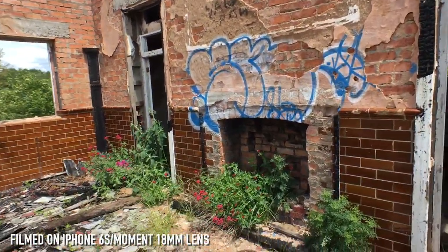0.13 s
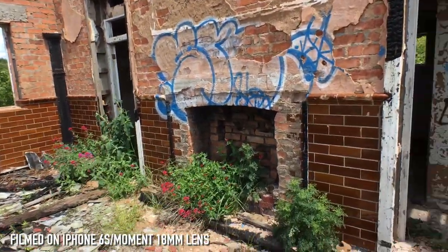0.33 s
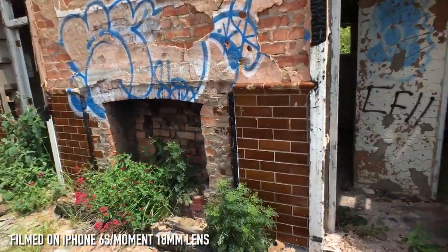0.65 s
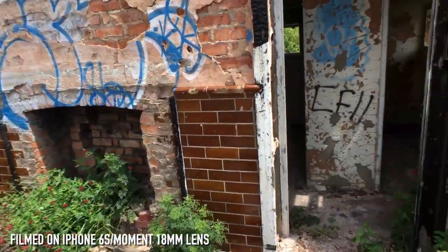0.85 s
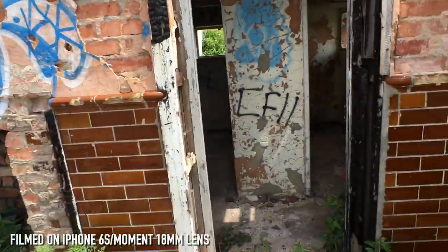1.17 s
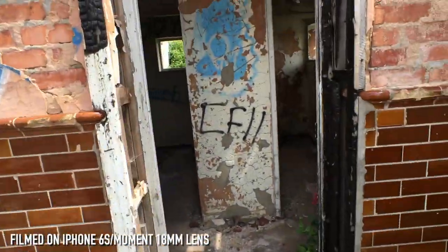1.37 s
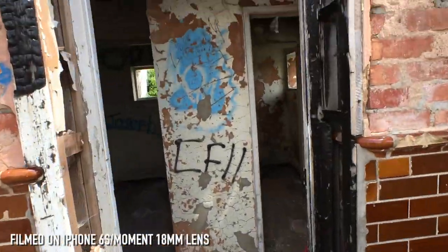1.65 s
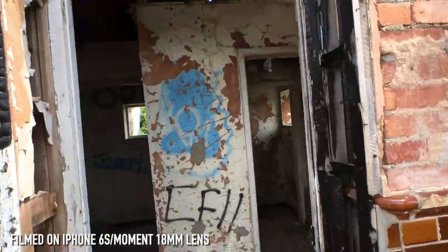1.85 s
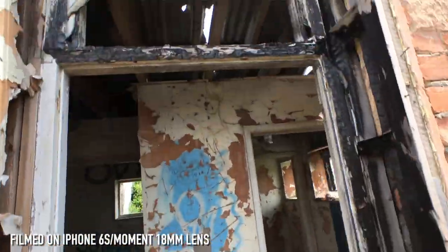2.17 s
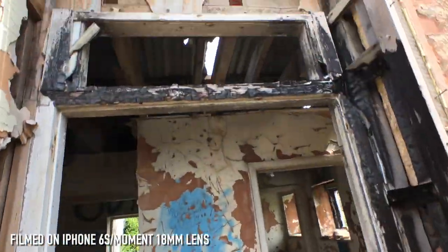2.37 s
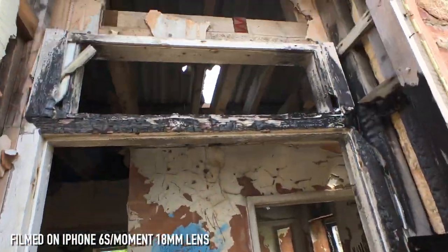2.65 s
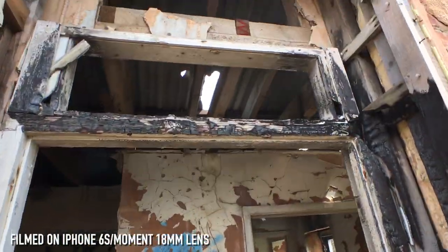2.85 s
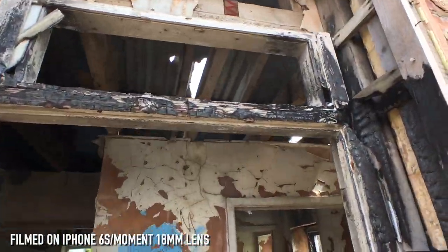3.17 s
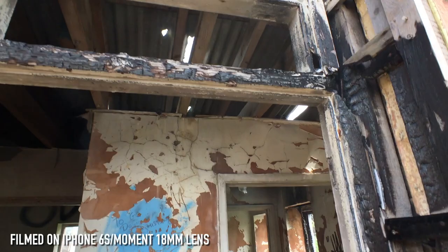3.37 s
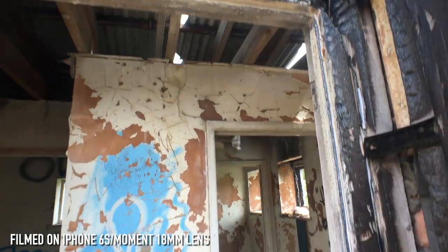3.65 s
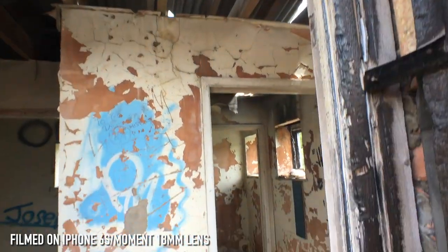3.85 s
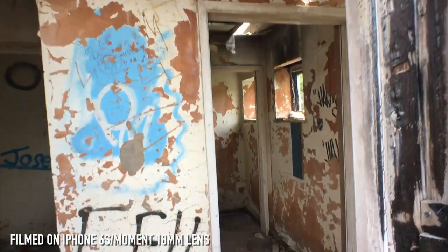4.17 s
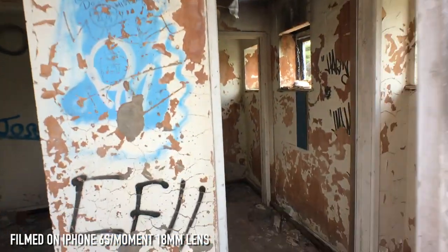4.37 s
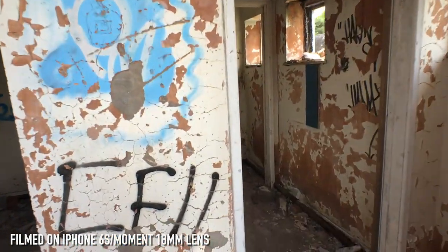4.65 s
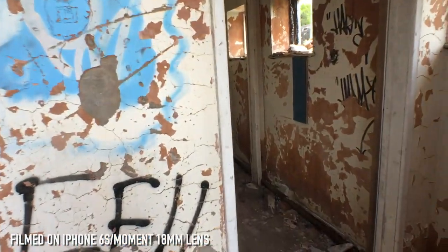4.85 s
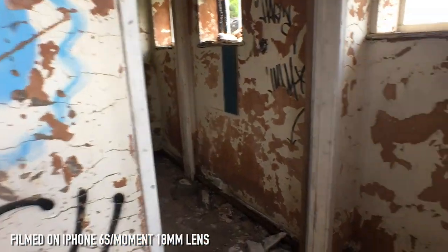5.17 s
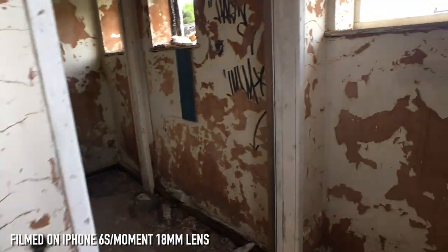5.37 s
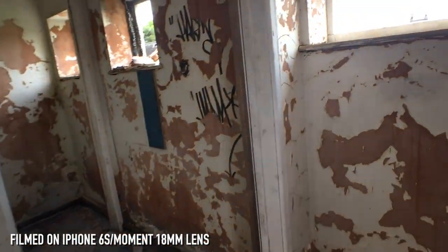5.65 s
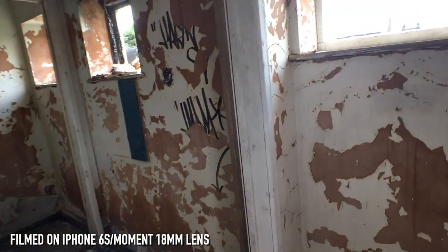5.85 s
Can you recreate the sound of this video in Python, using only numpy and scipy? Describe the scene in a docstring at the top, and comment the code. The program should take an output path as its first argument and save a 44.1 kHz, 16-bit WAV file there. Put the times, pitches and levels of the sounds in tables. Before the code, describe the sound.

Slow, uneven footsteps over broken glass and rubble, heard close in a bare derelict room with a short hard reverberation, over a very quiet outdoor hush. A small crack opens, then at 0.35-0.65 s a dense burst of brittle snaps and gritty crunching, thinning into ticks. At 1.3-1.5 s a heavier step knocks and cracks pieces together with a brief glassy ring. Another crunchy cluster comes at 1.9-2.4 s. Faint, falling bird whistles come from far outside between 1.7 and 3.3 s. Glass fragments clink delicately near 3.1 s; around 3.7 s a stone rasps briefly and shards clink again. Sharp cracks at 3.8 s and a firm knocking step at 4.0 s follow, then lighter crunches at 4.4-4.8 s. From 5.1 s clothing brushes in soft, dry rustles, with one small crack near 5.3 s and low air puffs on the microphone toward 5.9 s.

```python
"""Slow, uneven steps over broken glass and rubble, through a doorway into a derelict brick room.
Pieces snap and knock on the floor in noisy runs of slips, and shards clink in short decaying modes.
Grit grinds under the sole as dense random ticks, a stone rasps once, and the bare walls ring briefly.
A bird's gliding whistles come from far off; near the end clothing brushes past in bursts of fine ticks.
Air flutters low on the microphone, in puffs of shaped noise over a quiet outdoor hush."""
import sys
import numpy as np
from scipy import signal
from scipy.fft import rfft, irfft
from scipy.io import wavfile
from scipy.ndimage import uniform_filter1d

SR = 44100
rng = np.random.default_rng(int(sys.argv[2]) if len(sys.argv) > 2 else 0)


def transcribe(u):
    """Save the signal u as a 16-bit wav file named by the first command-line argument.

    u: samples, shape (n,) or (channels, n), limited to [-1, 1]; the rate is SR.
    q: integer samples, one column per channel.
    """
    v = np.clip(np.atleast_2d(u).T, -1, 1)
    q = np.round(v * 32767).astype(np.int16)
    wavfile.write(sys.argv[1], SR, q)


N = 265482
TIME = np.arange(N) / SR

# The sole settles softly, and each patch of floor has its own voice. Each row: start in seconds,
# floor resonance in Hz, level in dB, contact time in seconds, knock of pieces pressed on it in Hz,
# their thud in dB relative to the piece.
FOOTFALLS = [(.602, 330, -43, 0.0046, 1020, -4), (1.32, 345, -42, .0053, 920, -8.5),
             (1.387, 350, -46, 0.0041, 1010, -15), (2.11, 500, -50, 0.0052, 930, -9),
             (2.392, 594, -50, 0.0056, 1160, -19), (3.148, 626, -54, 0.0097, 900, -12),
             (4.0332, 236, -36, 0.0051, 850, -12), (4.487, 238, -48.5, 0.0057, 1130, -13),
             (4.632, 237.6, -45.5, 0.0047, 900, -16.5), (5.44, 181, -49, 0.018, 950, -7)]


def gain_of(db):
    """Decibels to an amplitude factor."""
    return 10 ** (np.asarray(db) / 20)


def evened(x):
    """Scales to rms 1."""
    return x / np.sqrt(np.mean(x ** 2) + 1e-20)


def blow(x):
    """Scales a short sound to the energy of a hundredth of a second at rms 1."""
    return x * np.sqrt(0.01 * SR / (np.sum(x ** 2) + 1e-20))


def read(points, hz):
    """Reads a curve of (Hz, value) points on a log-frequency axis."""
    f, value = np.transpose(points)
    return np.interp(np.log(hz + 1), np.log(f + 1), value)


def level(rows):
    """Gain over time from a curve of (seconds, dB) points."""
    s, db = np.transpose(rows)
    return gain_of(np.interp(TIME, s, db))


def coloured(x, points):
    """Filters x with a curve of (Hz, dB) points, then scales it to rms 1."""
    gains = gain_of(read(points, np.fft.rfftfreq(len(x), 1 / SR)))
    return evened(irfft(rfft(x) * gains, len(x)))


def band(x, lo_hz, hi_hz, order=2):
    """Causal band-pass."""
    sos = signal.butter(order, [lo_hz, min(hi_hz, SR / 2 - 100)], "band", fs=SR, output="sos")
    return signal.sosfilt(sos, x)


def resonate(x, hz, width_hz):
    """One resonance with a peak gain of 1."""
    return signal.lfilter(*signal.iirpeak(hz, hz / width_hz, SR), x)


def add(mix, s, sound):
    """Mixes a sound in at time s, cut where the mix ends."""
    part = mix[max(round(s * SR), 0):][:len(sound)]
    part += sound[:len(part)]


def swell(s, rise, fade):
    """An envelope that grows to 1 at time s and dies away."""
    return np.exp(-np.maximum((s - TIME) / rise, (TIME - s) / fade))


def fracture(t, seconds, spread_db=3.0, rise=0.18):
    """A run of tiny slips of uneven size that builds up and dies away."""
    seconds = max(seconds, .0003)
    sizes = gain_of(spread_db * rng.standard_normal(len(t)))
    envelope = (1 - np.exp(-t / (rise * seconds))) * np.exp(-t / seconds)
    return rng.standard_normal(len(t)) * sizes * envelope


def grains(per_s, spread_db, cycles, count=28):
    """Random ticks ring through paired resonances; small, high ones are the most frequent."""
    pitches = np.geomspace(250, 15000, count)
    shares = np.sqrt(pitches) / np.sqrt(pitches).sum()
    at = rng.integers(0, N, int(per_s * N / SR))
    sizes = gain_of(spread_db * np.minimum(rng.exponential(1, len(at)), 4))
    sizes = sizes * rng.choice([-1, 1], len(at))
    kind = rng.choice(count, len(at), p=shares)
    out = np.zeros(N)
    for k, hz in enumerate(pitches):
        ticks = np.bincount(at[kind == k], sizes[kind == k], N) / np.sqrt(shares[k])
        width = hz / max(cycles, 1)
        out += resonate(resonate(ticks, hz, width), hz, width)
    return out


def cracks(ring=0.97, body=0.43):
    """Each break snaps and fizzes at once; a moment later the piece knocks and the floor thuds."""
    # Breaking or shifting pieces. Each row: start in seconds, grinding time in seconds, crack in dB,
    # crack pitch in Hz, knock in dB, splinter fizz in dB.
    breaks = [(.004, 0.0014, -43, 3520, -50.5, -71), (0.112, 0.0025, -52.5, 2340, -49.5, -83),
              (0.3513, 0.0019, -31, 5060, -33.5, -44), (.369, 0.0024, -37, 4880, -60, -54),
              (0.4088, 0.00058, -36.5, 3274, -43, -50.5), (.447, 0.00099, -41.5, 4800, -44, -55),
              (.465, 0.0018, -42.5, 5430, -52, -56), (0.4919, 0.0014, -45, 5500, -69, -56),
              (0.5065, 0.0013, -39.5, 3900, -36.5, -52), (.5195, .002, -40, 4400, -60, -58),
              (0.526, 0.0044, -36, 3230, -49, -64), (0.5444, 0.0049, -33, 4400, -38.5, -31.5),
              (.557, 0.0019, -42, 3980, -38, -55), (0.601, 0.0011, -42.5, 3900, -43, -63),
              (.6471, 0.0027, -42.5, 3800, -44, -53.5), (.7328, 0.0011, -49, 4040, -54, -58),
              (0.7982, 0.002, -47, 3860, -48.5, -53.5), (0.9101, 0.0017, -54, 2950, -56.5, -63),
              (0.933, .0021, -56, 2350, -63, -57.5), (1.018, 0.0029, -56.5, 3630, -59, -64),
              (1.0424, 0.002, -55.5, 3200, -58.5, -65), (1.293, 0.0024, -37, 2860, -38, -50),
              (1.295, 0.004, -33, 2840, -27, -50), (1.3159, 0.012, -42.5, 3170, -41, -46),
              (1.357, 0.017, -41, 4280, -36.5, -51), (1.3836, 0.0087, -34.5, 2900, -39, -47),
              (1.4031, 0.0058, -29, 3000, -31, -46), (1.412, 0.0021, -29.5, 3280, -24, -45),
              (1.4187, .0067, -30.5, 2670, -39, -48), (1.45, 0.012, -32, 3400, -34.5, -53),
              (1.46, 0.01, -43, 3880, -35.5, -63), (1.4712, 0.0036, -34.5, 2750, -41, -58),
              (1.5912, 0.0058, -56, 4660, -49, -93), (1.6772, 0.0014, -47, 4360, -53.5, -51),
              (1.923, .0009, -55, 3660, -71, -56), (1.9363, 0.0016, -40, 3900, -52.5, -42),
              (1.942, 0.0029, -41.5, 4600, -55, -43), (2.017, 0.0013, -57, 3840, -79, -51.5),
              (2.0768, 0.009, -42.5, 3180, -48, -50.5), (2.092, 0.0077, -35, 3680, -40.5, -49),
              (2.109, 0.0042, -36, 3620, -58, -42.5), (2.122, 0.0024, -32.5, 3070, -40.5, -40.5),
              (2.13, 0.0034, -34, 3600, -55, -43), (2.183, 0.0057, -44, 4100, -54, -49.5),
              (2.211, 0.0087, -39.5, 3900, -58, -54), (2.3338, 0.0066, -43.5, 3770, -66, -54.5),
              (2.3907, 0.0025, -36.5, 4300, -46.5, -48), (2.397, 0.018, -38.5, 4100, -53, -49),
              (3.0595, 0.04, -48, 3970, -60, -49.5), (3.1419, 0.01, -48, 4730, -45.5, -51),
              (3.299, 0.0056, -52, 4640, -65, -58), (3.3608, 0.02, -48, 4400, -59, -59.5),
              (3.438, 0.0052, -47, 4210, -58.5, -62), (3.4843, 0.0059, -55, 5840, -78, -55),
              (3.516, 0.0044, -55, 4220, -55.5, -63), (3.556, 0.016, -48, 4100, -55.5, -62),
              (3.623, .012, -39, 4830, -43.5, -52), (3.732, .0053, -47, 5030, -71, -72),
              (3.825, 0.0076, -29, 3510, -44.5, -41), (3.8303, 0.0019, -32.5, 4120, -42, -42),
              (3.9088, 0.0038, -37, 4510, -52, -55), (4.0333, 0.002, -27.5, 4390, -29.5, -38),
              (4.039, 0.0016, -35, 3810, -23.5, -41), (4.2715, 0.0019, -53.5, 3600, -73, -77),
              (4.309, 0.0075, -49, 3950, -58, -61), (4.3804, 0.0047, -43, 3600, -51, -51.5),
              (4.4298, 0.0062, -61, 3900, -45.5, -70), (4.4863, 0.0021, -38.5, 4380, -50, -42),
              (4.56, 0.0065, -45.5, 4840, -62, -50), (4.633, 0.0024, -42, 5300, -46, -48.5),
              (4.637, 0.00097, -39, 4900, -37.5, -51), (4.738, 0.014, -53, 3870, -52.5, -65),
              (4.7803, 0.0044, -51, 3600, -58.5, -63), (5.0135, .0038, -56, 4000, -69, -72),
              (5.2875, 0.0031, -44.5, 4400, -55.5, -52)]
    # Hollow resonances of the littered floor. Each row: pitch in Hz, width in Hz, level in dB.
    floor_modes = [(190.7, 110, -5.5), (305, 43, -11.5), (354, 56, -3), (555, 60, -0.5), (708, 20, -2)]
    out = np.zeros(N)
    t = np.arange(4096) / SR
    for s, seconds, crack_db, crack_hz, knock_db, fizz_db in breaks + chips():
        knock_hz, shake_db = pressed(s)
        thud_db = max(crack_db, knock_db) + shake_db
        slips = fracture(t, seconds)

        snap = resonate(slips, crack_hz, 1900) + 0.15 * slips
        snap += ring * shard(slips, crack_hz, width_hz=70, scatter=.5)
        splinters = resonate(slips, 9230, 2200) + 0.18 * slips
        splinters += ring * shard(slips, 10500, width_hz=520, scatter=0.19)
        tap = resonate(slips, knock_hz, 350) + body * resonate(slips, .8 * knock_hz, 320) + 0.12 * slips
        thud = sum(gain_of(db) * resonate(slips, hz, width) for hz, width, db in floor_modes)

        add(out, s, gain_of(crack_db) * blow(band(snap, 1770, 6500, order=4)))
        add(out, s, gain_of(fizz_db) * blow(band(splinters, 7240, 13600, order=3)))
        add(out, s + 0.00035, gain_of(knock_db) * blow(band(tap, 482, 1500)))
        add(out, s + 0.00056, gain_of(thud_db) * blow(band(thud, 160, 1200)))
    return out


def chips(count=120, crowding=.65, growth=0.55, spread_db=5, fizz_growth=0.6, shortening=0.26):
    """Tiny chips give way at random, more and louder in hard grinding; small ones tick shorter, brighter."""
    # centre values under the hardest grinding
    chip_db, chip_hz, chip_s = -49.5, 3900, 0.0032
    chip_knock_db, chip_fizz_db = -57, -58.5
    force = grinding()
    share = np.cumsum(force ** crowding)
    when, chance, pitch = rng.random((count, 3)).T
    s = np.interp((np.arange(count) + when) / count, share / share[-1], TIME)
    force_db = 20 * np.log10(np.interp(s, TIME, force) / force.max())
    size_db = growth * force_db + spread_db * (2 * chance - 1)
    seconds = chip_s * gain_of(shortening * size_db)
    crack_hz = chip_hz * 2 ** (.5 * (pitch - .5))
    # same columns as the breaking pieces
    return list(zip(s, seconds, chip_db + size_db, crack_hz,
                    chip_knock_db + size_db, chip_fizz_db + fizz_growth * size_db))


def pressed(s):
    """Weight near a footfall presses pieces down: they take the floor's pitch and shake it more."""
    loose_hz, loose_thud_db = 1206, -21  # a piece lying free; its thud is relative to its own level
    load_s = 0.053  # how closely the weight keeps to the footfall
    landing, *_, knock_hz, thud_db = min(FOOTFALLS, key=lambda step: abs(step[0] - s))
    load = np.exp(-((s - landing) / load_s) ** 2)
    return loose_hz + load * (knock_hz - loose_hz), loose_thud_db + load * (thud_db - loose_thud_db)


def shard(slips, hz, width_hz, scatter, count=5):
    """Every piece has a few short modes of its own, scattered around hz."""
    modes = hz * np.exp(scatter * rng.uniform(-0.968, 1, count))
    return sum(resonate(slips, min(f, SR / 2 - width_hz), width_hz) for f in modes)


def footfalls(width_hz=110):
    """Rubber pushes on the floor and stirs one low, well damped resonance."""
    out = np.zeros(N)
    t = np.arange(SR // 5) / SR
    for s, hz, db, seconds, *_ in FOOTFALLS:
        push = resonate(fracture(t, seconds), hz, width_hz)
        add(out, s, gain_of(db) * blow(band(push, hz / np.sqrt(2), hz * 2, order=3)))
    return out


def glass(wander=0.022):
    """A pane fragment's modes shift a little at each touch; splinters ring in a close cluster."""
    # A loose pane fragment is nudged. Each row: start in seconds, level in dB,
    # contact time in seconds (0.3 ms at least is used), brightness in dB per octave.
    clinks = [(3.049, -51.5, 0.0026, 2), (3.06, -41, 0.0018, 6.5), (3.079, -49, 0.01, 3),
              (3.104, -44, 0.022, 4.5), (3.139, -41.5, 0.0024, 3), (3.158, -43.5, 0.0034, 8),
              (3.732, -39, 0.00027, -15), (3.7368, -42, 0.00094, -2), (3.75, -42.5, 0.00066, -14),
              (3.767, -46, 0.0035, 3)]
    # Modes of the fragment. Each row: nominal pitch in Hz, relative level in dB, 60 dB decay in seconds.
    pane_modes = [(2490, -11, 0.055), (3050, 3, 0.038), (3490, -3, 0.092), (3600, -16, .04), (3900, 1, .08),
                  (4400, -2, 0.077), (4740, -42, .05), (5435, 1.5, 0.037), (5850, -9, 0.054),
                  (7200, -17, .04), (8760, -12, .03), (9100, -7.5, .04), (9930, -6, 0.033),
                  (11700, -14.5, .04)]
    # Small splinters that ring around one note. Each row: start in seconds, pitch in Hz, level in dB,
    # 60 dB decay in seconds.
    pings = [(.696, 4540, -46, 0.046), (1.17, 3185, -51.5, 0.073), (1.3025, 5500, -41, 0.042),
             (1.362, 9660, -45.5, .053), (1.4091, 2520, -25.5, 0.022), (1.412, 5430, -31.5, .037),
             (1.9369, 9100, -31, 0.0044), (1.9369, 12700, -39, .0046), (2.123, 2450, -36, 0.015),
             (2.392, 3600, -44, 0.2), (2.396, 5400, -45, 0.12), (3.158, 4300, -41, 0.046),
             (3.4845, 5830, -47, 0.029), (3.7324, 5620, -35, .057), (3.766, 9500, -52, .06),
             (4.3805, 3550, -40, 0.02), (4.482, 5930, -44, 0.025), (4.634, 5850, -38, 0.033),
             (4.637, 3650, -43.5, 0.046)]
    out = np.zeros(N)
    t = np.arange(SR // 4) / SR
    for s, db, seconds, bright_db in clinks:
        contact = fracture(t, seconds)
        clink = np.zeros(len(t))
        for hz, mode_db, t60 in pane_modes:
            touched_hz = hz * (1 + wander * rng.uniform(-1.0, 1))
            mode = np.sin(2 * np.pi * touched_hz * t) * gain_of(-60 * t / t60)
            ring = signal.fftconvolve(contact, mode)[:len(t)]
            ring = resonate(ring, hz, hz / 10)  # thin glass gives off little between its modes
            clink += gain_of(mode_db + bright_db * np.log2(hz / 5000)) * blow(ring)
        add(out, s, gain_of(db) * blow(clink))
    partials = [(.945, -6.5), (.982, 1), (1, -1.5), (1.035, -4)]  # pitch ratio, dB
    for s, hz, db, t60 in pings:
        cluster = sum(gain_of(partial_db) * np.sin(2 * np.pi * (hz * ratio * t + rng.random()))
                      for ratio, partial_db in partials)
        add(out, s, gain_of(db) * blow(resonate(cluster * gain_of(-60 * t / t60), hz, hz * 0.23)))
    return out


def grit(dust_db=-4, crumbs_db=-7):
    """Fine dust crackles while weight rests on the sole, and a few glass crumbs tick in it."""
    # Spectrum of the dust. Each row: frequency in Hz, relative level in dB.
    dust_colour = [(150, -30.5), (500, 2.5), (1100, 1), (1800, -2.5), (4000, -4.5), (5800, 3), (7300, -10),
                   (9500, -8), (13000, -10), (16000, -13)]
    dust = coloured(grains(per_s=8400, spread_db=6.5, cycles=1.8), dust_colour)
    crumbs = evened(band(grains(per_s=570, spread_db=8, cycles=10), 720, 5000))
    return grinding() * (gain_of(dust_db) * dust + gain_of(crumbs_db) * crumbs)


def grinding():
    """How hard the sole works the grit, as a gain over time: overlapping swells add in power."""
    # The sole presses or turns on the grit. Each row: peak in seconds, force in dB,
    # rise in seconds, fade in seconds.
    presses = [(.02, -55.5, 0.054, .09), (.37, -53, .008, .08), (.525, -38, .015, .065),
               (.97, -62, .12, .1), (1.4, -57, .04, .04), (1.681, -58.5, .06, .12),
               (2.13, -46.5, .025, .085), (2.44, -59, .06, .025), (2.835, -68, .008, .015),
               (3.7, -54, .25, .08), (4.46, -57, .1, .03), (4.68, -57, .09, .14)]
    return np.sqrt(sum((gain_of(db) * swell(s, rise, fade)) ** 2 for s, db, rise, fade in presses))


def scrape(width_hz=700):
    """A stone dragged by the sole sticks and slips through a resonance that sinks."""
    # The path of the drag. Each row: time in seconds, resonance in Hz, level in dB.
    drag = [(3.636, 2500, -66), (3.665, 1880, -54), (3.689, 1130, -50), (3.712, 1000, -83)]
    s, hz, scrape_db = np.transpose(drag)
    t = np.arange(s[0], s[-1], 1 / SR)
    slips = rng.standard_normal(len(t)) * (rng.random(len(t)) < 1500 / SR)
    # shift the gliding pitch down to zero, smooth there, and shift back up
    turn = np.exp(2j * np.pi * np.cumsum(np.interp(t, s, hz)) / SR)
    r = np.exp(-np.pi * width_hz / SR)
    rasp = (turn * signal.lfilter([1 - r], [1, -r], slips / turn)).real
    rasp = evened(band(rasp, 480, 5000))
    out = np.zeros(N)
    add(out, s[0], gain_of(np.interp(t, s, scrape_db)) * rasp * signal.windows.tukey(len(t), .3))
    return out


def cloth(rub_db=-4.0, swish_db=-1, catch_db=1.5):
    """Fibres catch and let go densely: a dull rub and a bright swish."""
    # A sleeve brushes past. Each row: peak in seconds, rise in seconds, fade in seconds,
    # rub in relative dB, swish in relative dB.
    brushes = [(5.116, 0.0078, 0.12, -47.5, -58.5), (5.17, .012, 0.14, -55.5, -52),
               (5.285, 0.056, 0.028, -46.5, -53.5), (5.405, 0.017, 0.021, -56.5, -53.5),
               (5.47, 0.08, 0.11, -51.5, -61), (5.778, 0.015, .06, -79, -56.5),
               (5.85, 0.052, 0.14, -47, -52.5)]
    # Spectrum of the dull rub. Each row: frequency in Hz, relative level in dB.
    rub_colour = [(120, 2), (300, -2), (600, 3), (1200, 1), (1900, 3.5), (3500, -2.5), (5700, 3),
                  (7000, -10), (10000, -47), (16000, -28)]
    # Spectrum of the bright swish. Each row: frequency in Hz, relative level in dB.
    swish_colour = [(100, -68), (4000, 1), (7500, -7), (9700, 1), (12500, -1.5), (15500, -9)]
    catching = gain_of(catch_db * evened(uniform_filter1d(rng.standard_normal(N), 400)))
    power = sum(np.outer(gain_of(dbs), swell(s, rise, fade)) ** 2 for s, rise, fade, *dbs in brushes)
    dull, bright = np.sqrt(power)
    rub = dull * coloured(grains(per_s=10000, spread_db=3.5, cycles=5.7), rub_colour)
    swish = bright * coloured(grains(per_s=30000, spread_db=0.5, cycles=6.5), swish_colour)
    return catching * (gain_of(rub_db) * rub + gain_of(swish_db) * swish)


def bird(db=-2, waver=0.038, bend=1.24):
    """Falling whistles: single sines whose pitch wavers and falls faster toward the end of a note."""
    # Whistled notes. Each row: start in seconds, length in seconds, start pitch in Hz,
    # end pitch in Hz, relative level in dB.
    notes = [(1.66, 0.12, 1666, 1580, -59.5), (1.82, .07, 2370, 1860, -60.5), (2.042, .04, 2010, 1890, -58),
             (2.271, .06, 2150, 1867, -61), (2.523, 0.11, 2140, 1960, -65), (2.81, .07, 2160, 1820, -66),
             (3.06, .04, 2080, 1770, -68), (3.303, .06, 2270, 1970, -58)]
    out = np.zeros(N)
    for s, seconds, start_hz, end_hz, note_db in notes:
        t = np.arange(0, seconds, 1 / SR)
        wobble = evened(uniform_filter1d(rng.standard_normal(N), 200))[:len(t)]
        hz = start_hz + (end_hz - start_hz) * (t / seconds) ** bend
        turns = np.cumsum(hz * (1 + waver * wobble)) / SR
        whistle = np.sin(2 * np.pi * turns) * signal.windows.tukey(len(t), .4)
        add(out, s, gain_of(db + note_db) * whistle)
    return out


def distant(x, t60=0.37, scattered=0.48):
    """Trees and walls outside smear a far sound with a decaying noise tail."""
    t = np.arange(SR // 2) / SR
    tail = rng.standard_normal(len(t)) * gain_of(-60 * t / t60)
    smear = signal.fftconvolve(x, tail / np.linalg.norm(tail))[:N]
    return (x + scattered * smear) / np.hypot(1, scattered)


def room(x, echo_db=-1):
    """A few near reflections, then a short diffuse tail whose treble dies first."""
    # Decay of the room. Each row: frequency in Hz, 60 dB decay in seconds.
    decay = [(150, 0.48), (500, 0.41), (1000, 0.29), (3000, 0.31), (5500, 0.25), (9000, 0.19),
             (16000, 0.093)]
    # Reflections off floor, door frame and walls. Each row: delay in seconds, relative level in dB.
    echoes = [(.0053, -24.5), (.0075, -16.5), (0.0122, -16), (0.0186, -18), (0.027, -23.5)]
    # How much of the room is heard along the walk. Each row: time in seconds, tail level in dB.
    wetness = [(0, -13.5), (1, -11), (1.4, -17), (2.1, -12.5), (3.1, -12.5), (3.8, -12), (4.1, -13),
               (4.6, -7.5), (6, -21.5)]
    early = np.zeros(SR // 20)
    for delay, db in echoes:
        add(early, delay, gain_of([db + echo_db]))
    taps = rng.standard_normal(SR) * (rng.random(SR) < 4000 / SR)
    hz, t, z = signal.stft(taps, SR, nperseg=256)
    tail = signal.istft(z * gain_of(-60 * t / read(decay, hz)[:, None]), SR, nperseg=256)[1]
    tail *= np.clip((np.arange(len(tail)) / SR - .003) / 0.0013, 0, 1)  # the tail sets in after 3 ms
    tail /= np.linalg.norm(tail)
    return x + signal.fftconvolve(x, early)[:N] + signal.fftconvolve(x * level(wetness), tail)[:N]


def air(hush_db=-65.5, draught_db=-67, puff_rise_s=0.021, puff_fade_s=0.043):
    """Quiet outdoor hush, and a low flutter of air on the microphone: both are shaped noise."""
    # Spectrum of the hush. Each row: frequency in Hz, relative level in dB.
    hush_colour = [(59, -27.5), (100, -0.5), (244, -4), (328, -1.5), (492, -12.5), (1060, -9.5),
                   (1520, -15.5), (1910, -12.5), (2690, -22), (3120, -15.5), (5420, -19.5), (7450, -31.5),
                   (9820, -26), (13500, -30.5), (16000, -49.5)]
    # Puffs on the microphone, over a steady draught. Each row: peak in seconds, level in dB.
    puffs = [(2.83, -57), (4.56, -62.5), (5.5, -62), (5.65, -56), (5.751, -54), (5.869, -49.5)]
    # Spectrum of the flutter. Each row: frequency in Hz, relative level in dB.
    flutter_colour = [(15, -23), (30, -5.5), (50, 5), (70, 0), (120, -9), (200, -21.5), (500, -46.5),
                      (2000, -80)]
    hush = gain_of(hush_db) * coloured(rng.standard_normal(N), hush_colour)
    flow = gain_of(draught_db) + sum(gain_of(db) * swell(s, puff_rise_s, puff_fade_s) for s, db in puffs)
    return hush + flow * coloured(rng.standard_normal(N), flutter_colour)


def scene():
    """All sources sound in the room, over the hush and the flutter of air."""
    # Overall tone of the debris sounds: a shared equaliser, fuller near 500 Hz and 2 kHz,
    # thin in the bass. Each row: frequency in Hz, gain in dB.
    debris_tone = [(100, -6.5), (170, -2.5), (300, -1.5), (500, 1.5), (820, -1), (1100, -1.5), (1600, 2),
                   (2150, 2.5), (2900, -2), (4200, -1.5), (6600, -0.5), (10000, -1), (16000, -1)]
    debris = cracks() + glass() + grit() + scrape() + footfalls()
    tone = gain_of(read(debris_tone, np.fft.rfftfreq(N, 1 / SR)))
    debris = irfft(rfft(debris) * tone, N)
    return (room(debris + cloth() + distant(bird())) + air())[None]


def record(dry):
    """The recorder's band limit: a steep low-pass."""
    edge_hz = 16400
    lowpass = signal.firwin(511, edge_hz, window=("kaiser", 9), fs=SR)
    return signal.oaconvolve(dry, lowpass[None], "same")


dry = scene()
out = record(dry)
transcribe(out)
```